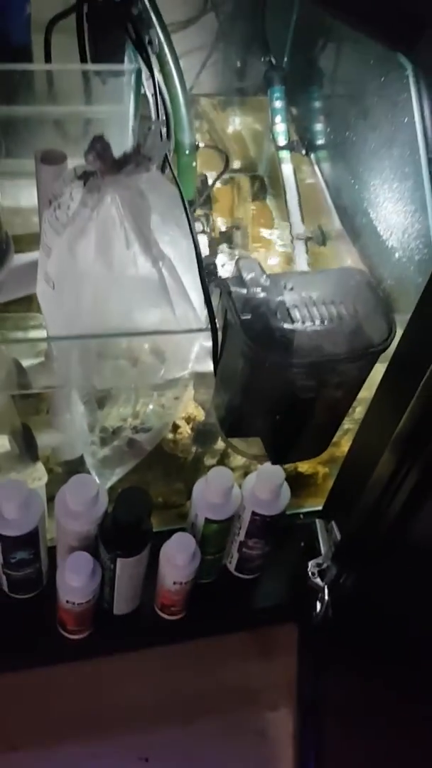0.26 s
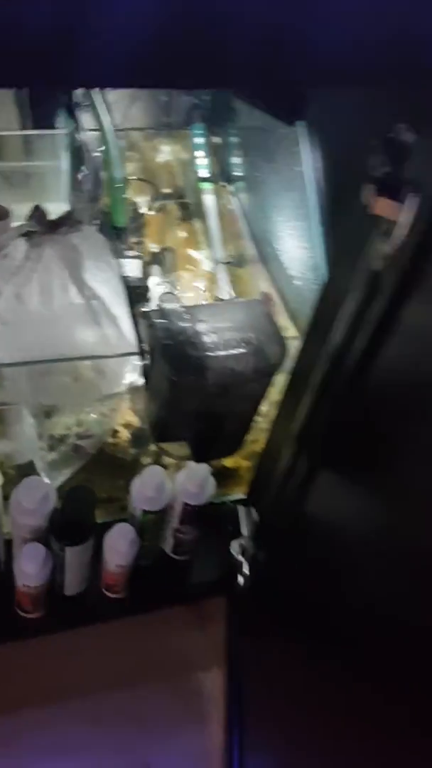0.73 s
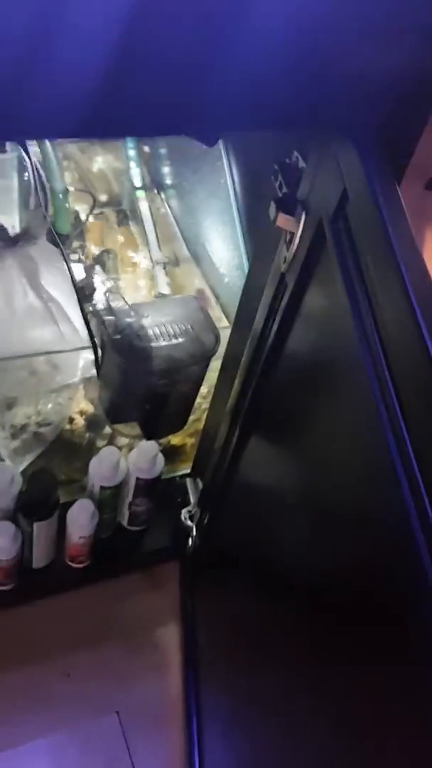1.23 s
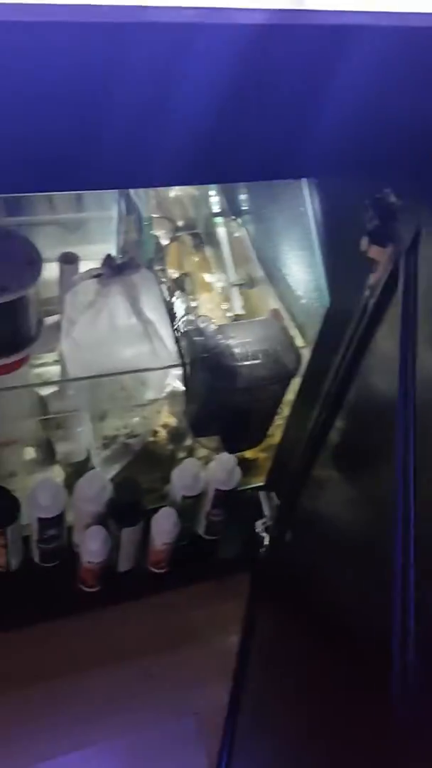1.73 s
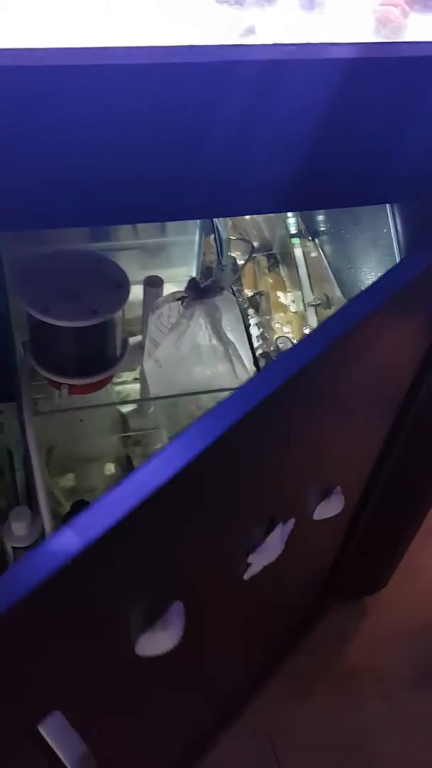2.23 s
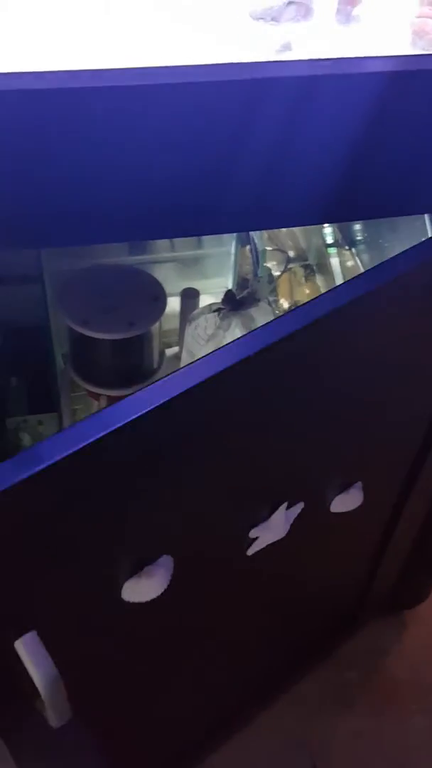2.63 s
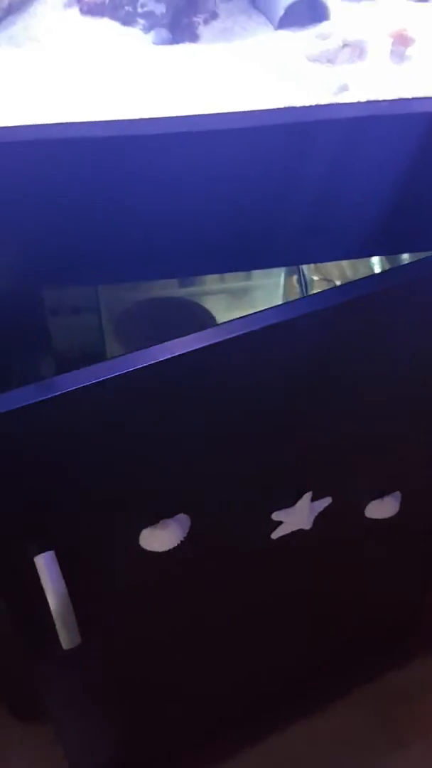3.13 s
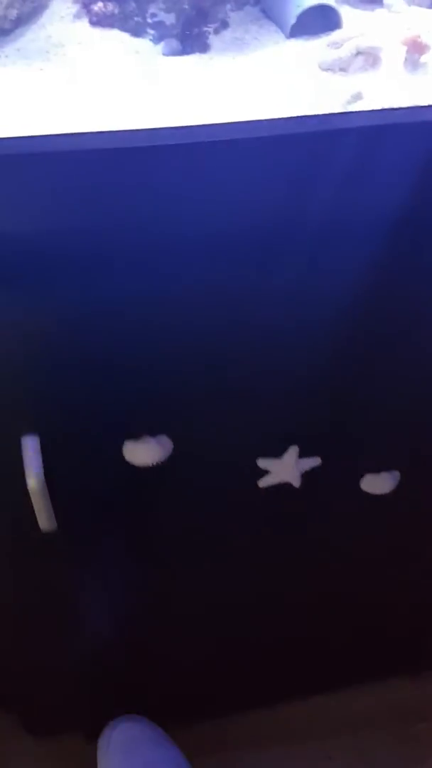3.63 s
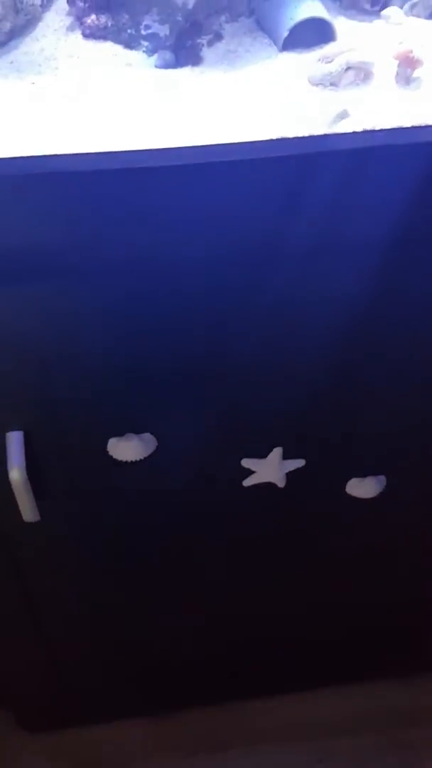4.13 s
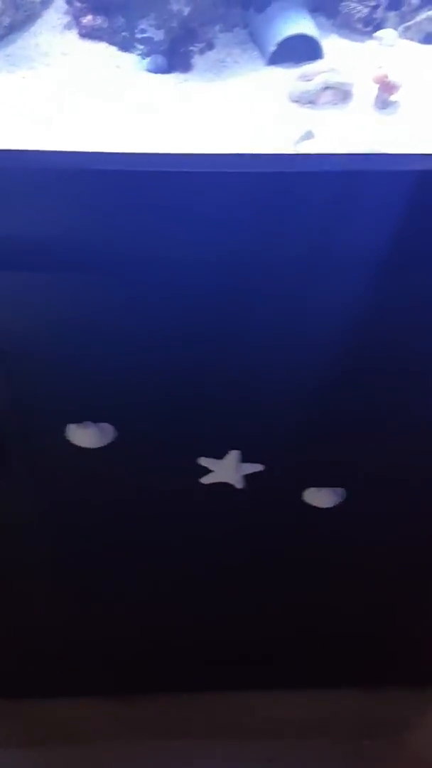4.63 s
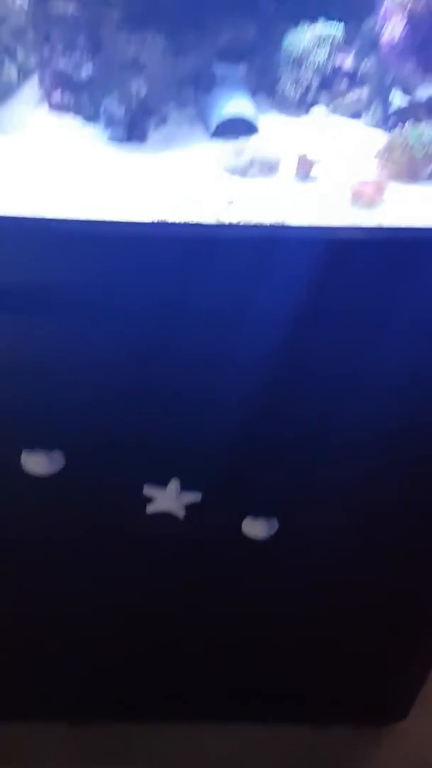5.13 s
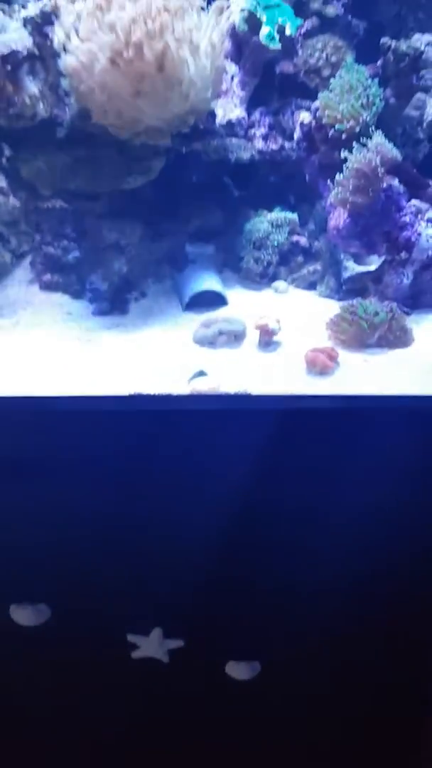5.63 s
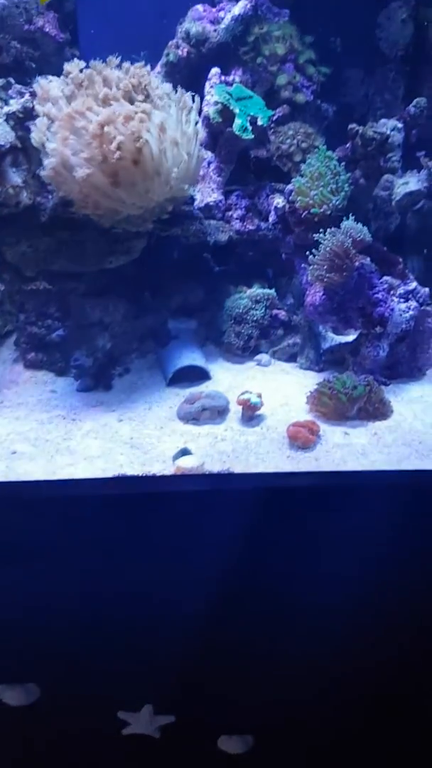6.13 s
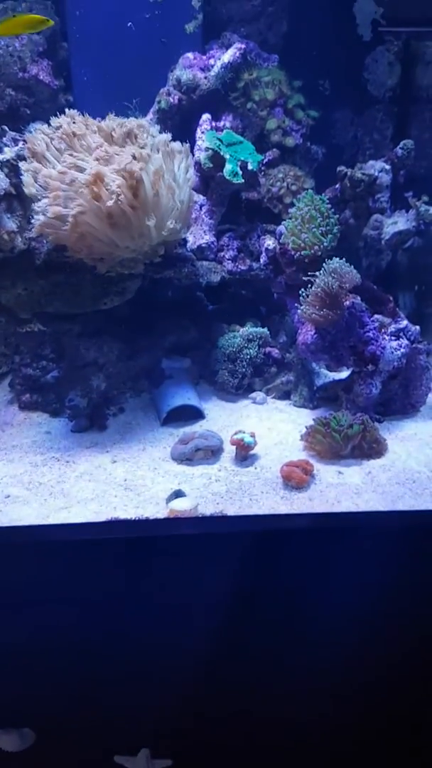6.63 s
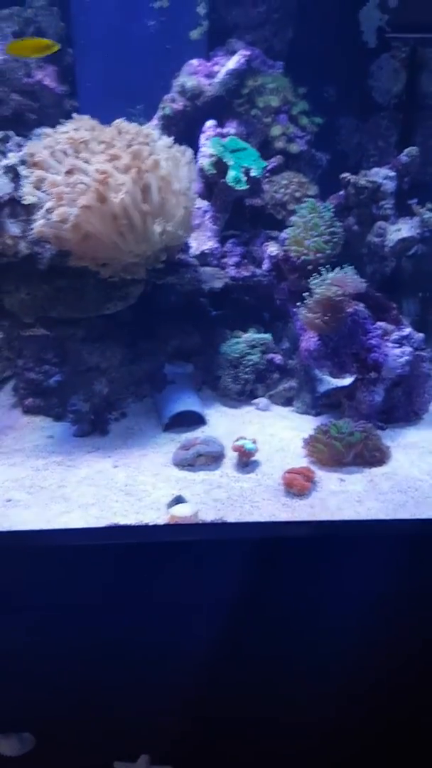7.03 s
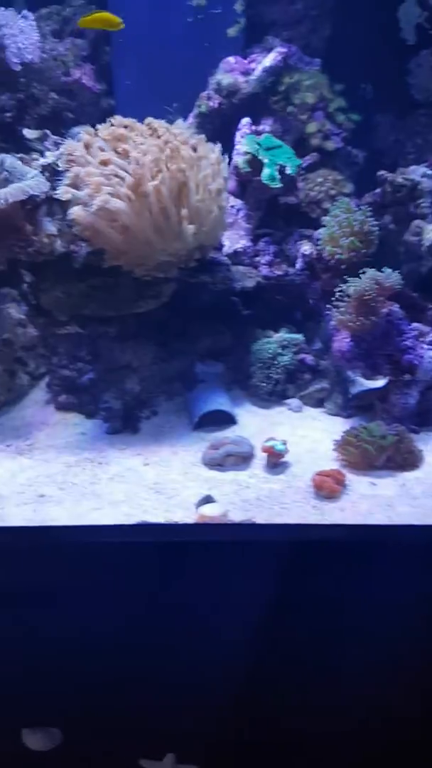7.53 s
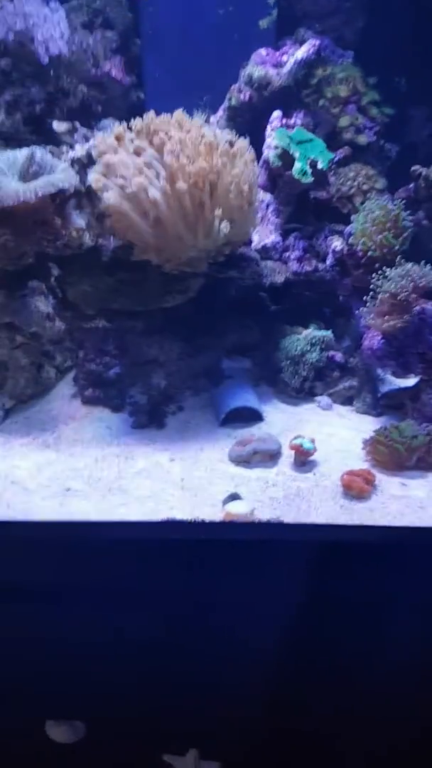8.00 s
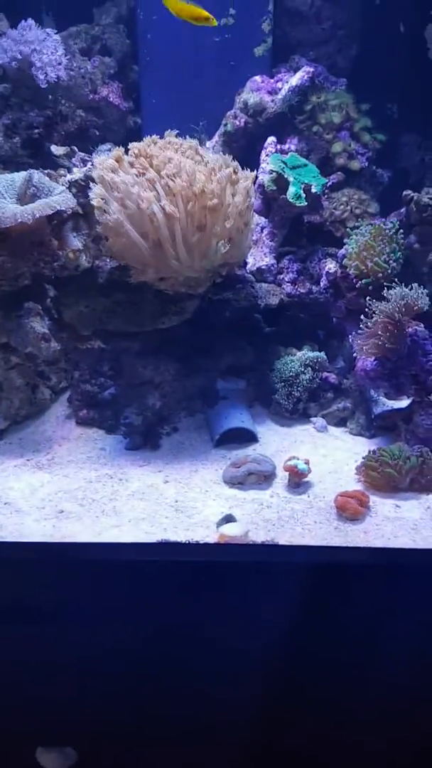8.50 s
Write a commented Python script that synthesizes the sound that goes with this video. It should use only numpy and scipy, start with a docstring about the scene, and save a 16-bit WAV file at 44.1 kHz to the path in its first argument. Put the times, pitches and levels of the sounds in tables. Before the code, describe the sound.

From the start, water trickles softly in an aquarium sump, a bright wash of tiny splashes with drips, fizz and occasional low gulps. A low pump hum lies underneath, fading after about 1 second and returning by 5 seconds. A wooden cabinet door gives a soft, dull bump at about 1.5 seconds and another at 2.6, with fainter knocks just after 3. At about 3.8 seconds the door slams shut close by, much the loudest sound, with a sharp metal latch snap, a low thrum and a brief rattle dying away by 4.2. Small ticks follow at about 4.4 and 4.7, and a faint knock at 6.4. The water dips briefly after the slam, then carries on quieter and more muffled, with distinct drops plinking and pipe gurgles over the hum until the end, near 8.8 seconds.

```python
"""A room with an aquarium, its sump trickling inside a wooden cabinet over the hum of mains pumps.
The water is a wash of tiny splashes, with bubbles that ring as drips, fizz, plinks and gulps.
The listener steps back; a hand bumps the door, which thrums, latches with a slam and rattles.
The slam ducks the gain control, and the drips plink on in the room while it recovers."""
import sys
import numpy as np
from scipy import signal
from scipy.fft import rfft, irfft
from scipy.io import wavfile
from scipy.ndimage import uniform_filter1d

SR = 44100
rng = np.random.default_rng(int(sys.argv[2]) if len(sys.argv) > 2 else 0)


def int16_out(signal):
    """Quantize to a 16-bit WAV file."""
    q = np.round(np.clip(np.atleast_2d(signal).T, -1, 1) * 32767)
    wavfile.write(sys.argv[1], SR, q.astype(np.int16))


N = 386316

# The water. Each row: time in seconds, level in dB, share of the bright colour 0-1, leftward lean in dB.
WATER_PATH = [(0.0, -46.5, .8, -1.5), (.85, -48.5, .85, -2), (1.25, -50, 0.78, -0.5),
              (1.45, -49.5, 0.45, -3.5), (1.75, -51.5, 0.63, -1.5), (2.2, -51, .46, -0.5),
              (3.4, -52, 0.56, -0.3), (3.7, -52.5, 0.63, 0), (4.95, -56, .3, 0.2), (5.4, -53.5, 0.39, 0.5),
              (5.75, -53.5, 0.3, 0), (6.5, -54.5, 0.42, 0), (6.8, -54.5, 0.44, 0.8),
              (7.5, -54.5, 0.24, 0.5), (8.25, -54.5, 0.35, 0.4), (8.76, -54, 0.53, 0.5)]
# Stereo width. Each row: frequency in Hz, correlation of left and right.
LIKENESS = [(60, 0.81), (180, 0.93), (550, 0.55), (1650, -0.15), (4970, -0.037), (15000, -0.019)]


def trickle():
    """Countless tiny splashes: patchy noise with flickering treble, drifting from bright to muffled."""
    # The bright and the muffled colour of the wash. Each row: frequency in Hz, level in dB.
    bright_tone = [(15, -52), (25, -27), (50, -4), (91, -12), (150, -9.5), (291, -3), (450, -12),
                   (730, -19.5), (1000, -17.5), (1500, -17.5), (2580, -14), (5500, -20.5), (15700, -29.5)]
    muffled_tone = [(15, -64), (25, -35), (43, -13), (70, -4.5), (91, -19), (169, -10), (291, 1.5),
                    (586, -22), (670, -17.5), (2080, -21.5), (2580, -17.5), (5490, -32), (15700, -36.5)]
    # Pipe and cabinet air resonances of each colour. Each row: centre in Hz, width in Hz, level in dB.
    bright_air = [(312, 100, -10.5), (551, 41, 8), (1010, 47, 4), (1224, 39, -8), (2020, 56, -10),
                  (2520, 140, -10.5)]
    muffled_air = [(133, 28, 4.5), (290, 14, -28), (557, 17, -22.5), (696, 73, -1), (1815, 170, -15),
                   (2555, 38, -5.5), (3170, 81, -32)]
    # Midrange swell around 915 Hz. Each row: time in seconds, boost in dB.
    mid_swell = [(0, 0.5), (1.2, 4.5), (2.7, 2.5), (3, -1), (4.5, 1.3), (4.9, 8.5), (5.3, -3), (7.2, -.1),
                 (7.4, 5), (7.8, 7), (8, .1), (8.76, -2.5)]
    # Stereo balance. Each row: frequency in Hz, leftward lean in dB.
    balance = [(60, 1), (180, -1.5), (550, -1), (1650, -2), (4970, -2.5), (15000, 4.5)]
    hop, size = 512, 2048
    frames, hz = N // hop + 5, np.fft.rfftfreq(size, 1 / SR)
    t = np.arange(frames) * hop / SR
    times, db, brightness, lean_db = np.transpose(WATER_PATH)
    brightness = np.interp(t, times, brightness)
    tone_db = brightness * cabinet_colour(bright_tone, bright_air, hz, t, gurgle_db=2.8)
    tone_db += (1 - brightness) * cabinet_colour(muffled_tone, muffled_air, hz, t, gurgle_db=0.68)
    mid_band = np.exp(-(np.log2(hz / 915 + 1e-9) / 0.26) ** 2)
    tone_db += np.outer(mid_band, np.interp(t, *np.transpose(mid_swell)))
    a, b, c, d, patches = rng.standard_normal((frames, len(hz), 5)).T
    patches = unit_rms(uniform_filter1d(uniform_filter1d(patches, size=20, axis=0), size=7, axis=1))
    spectra = stereo_pair(a + 1j * b, c + 1j * d, curve_at(LIKENESS, hz)[:, None])
    lean = curve_at(balance, hz)[:, None] + np.interp(t, times, lean_db)
    spectra *= amp(tone_db + np.interp(t, times, db) + 1.33 * patches + np.array([lean, -lean]) / 2)
    treble = np.clip(np.log2(hz / 2500 + 1e-9) / 1.97, 0, 1)[:, None]
    layers = [spectra * (1 - treble), spectra * treble]
    body, spray = amp(6) * signal.istft(layers, nperseg=size, noverlap=size - hop)[1][..., :N]
    coarse = np.arange(0, N, 100) / SR
    flicker_db = np.interp(np.arange(N) / SR, coarse, 2 * drift(coarse, 6, 60))
    return body + spray * amp(flicker_db)


def cabinet_colour(tone, resonances, hz, t, gurgle_db):
    """A broad spectrum in dB with air resonances standing out of it, each gurgling on its own."""
    power = amp(curve_at(tone, hz))[:, None] ** 2
    for centre, width, db in resonances:
        peak = 1 / (1 + (2 * (hz - centre) / width) ** 2) ** 2
        power = power + np.outer(peak, amp(db - 5.5 + gurgle_db * drift(t, 7.1, 22)) ** 2)
    return 10 * np.log10(power / power[(hz > 450) & (hz < 9000)].sum(0).mean())


def bubble(hz, cycles, glide):
    """A bubble rings down, to 1/e after `cycles` periods, while its pitch rises."""
    t = np.arange(0, 4 * cycles / hz, 1 / SR)
    tone = np.sin(2 * np.pi * hz * t * (1 + glide * t * hz / cycles))
    return tone * np.exp(-t * hz / cycles) * (1 - np.exp(-t / 0.00032))


def drips():
    """Each splash frees four bubbles of nearby pitch, one after another."""
    # The loudest splashes. Each row: start in seconds, level in dB, pitch in Hz, leftward lean in dB.
    splashes = [(.2753, -40, 3600, -7), (.408, -48, 2060, -4), (.4618, -38.5, 3840, -11),
                (.4903, -43, 2220, -5.5), (.7213, -38.5, 3330, -1.5), (1.1922, -42, 4060, -9),
                (1.3997, -44, 1710, -2), (1.494, -47, 1590, -1), (1.5843, -44.5, 2980, -3),
                (1.6901, -43.5, 4030, -2.5), (2.2288, -45, 1730, -6), (2.7137, -46, 2100, 2),
                (2.9816, -44.5, 3460, -7), (3.4615, -43, 2080, -1.5), (3.5214, -45, 2020, -2),
                (4.3295, -41.5, 2920, 5), (5.0128, -47.5, 1620, -3), (5.3117, -42, 2820, 2),
                (5.125, -46, 4600, -1), (5.389, -46, 2780, 4), (5.44, -44, 4150, -1),
                (5.6334, -44, 3500, .5), (5.7008, -40.5, 3140, 8), (5.74, -42, 2970, .5),
                (5.8275, -44, 3320, -3), (6.1443, -44.5, 3400, .5), (6.4885, -44, 3670, 1),
                (6.5518, -42, 3150, 14), (6.7778, -41.5, 2960, .5), (7.13, -47.5, 1765, .5),
                (7.1779, -42, 4050, -1), (7.2877, -45, 3150, 8), (7.345, -44, 3150, .1),
                (7.4259, -46, 3630, -2.5), (7.592, -45, 4940, -3), (7.7746, -41.5, 3280, 6),
                (7.8404, -46, 1760, -1.5), (8.3677, -43, 3660, 5), (8.6092, -39, 3500, .1),
                (8.6895, -48, 3430, -1.5)]
    rows = splashes + strays(1700, 4200, over_db=3.5, spread_db=2.7, count=50)
    out, chance = np.zeros((2, N)), rng.uniform(-1, 1, (len(rows), 4, 3))
    for (start, db, hz, lean_db), draws in zip(rows, chance):
        for k, (late, detune, size) in enumerate(draws):
            ring = bubble(hz * (1 + k * 0.079 * detune), cycles=8.2, glide=0.0076)
            place(out, start + k * 0.012 * (1 + late), amp(db - 2.3 * k + 2.2 * size) * ring, lean_db)
    return out


def drain_pipe():
    """Single drops plink once in the pipe; large bubbles gulp far lower."""
    # The loudest plinks and gulps. Each row: start in seconds, level in dB, pitch in Hz.
    plinks = [(.3935, -46, 2600), (.6035, -51, 2650), (.8545, -42, 2620), (2.6948, -45.5, 2400),
              (3.4627, -41.5, 2380), (5.598, -48, 2600), (5.7484, -46, 2570), (6.641, -46, 2520),
              (6.7863, -43.5, 2560), (6.8165, -48, 2580), (6.849, -42, 2570), (6.905, -44.5, 2530),
              (7.152, -45.5, 2300), (7.216, -44, 2570), (7.2865, -45.5, 2620), (7.3196, -46, 2640),
              (7.8115, -44.5, 2540), (8.0364, -46, 2540), (8.2466, -43, 2540), (8.3687, -45, 2550),
              (8.6448, -43.5, 2560)]
    gulps = [(.27, -39, 295), (.476, -36.5, 368), (.706, -37, 990), (0.849, -38, 1010), (1.033, -37, 1010),
             (1.105, -36.5, 314), (1.96, -39, 284), (2.325, -39.5, 356), (2.453, -38.5, 287),
             (2.625, -34.5, 314), (2.76, -38.5, 201), (3.252, -34.5, 315), (4.925, -36, 290),
             (5.47, -37, 263), (5.665, -35, 297), (5.74, -39, 700), (6.144, -38, 278), (6.597, -36, 301),
             (7.173, -36, 290), (7.267, -39, 310), (8.418, -35, 269), (8.547, -37.5, 290),
             (8.627, -35, 282)]
    out = np.zeros((2, N))
    for start, db, hz, *_ in plinks + strays(2480, 2630, over_db=3.8, spread_db=1.6, count=40):
        place(out, start, amp(db) * bubble(hz, cycles=29, glide=0.0014), lean_db=-3.3)
    for start, db, hz, *_ in gulps + strays(229, 364, over_db=7.9, spread_db=2.5, count=32):
        place(out, start, amp(db) * bubble(hz, cycles=3.8, glide=0.012), lean_db=-1.8)
    return out


def strays(low_hz, top_hz, over_db, spread_db, count):
    """Fainter random drops that follow the water, as rows of start, level, pitch and lean."""
    when, size, pitch, side = rng.random((count, 4)).T
    times, db, _, lean_db = np.transpose(WATER_PATH)
    starts = when * N / SR
    levels = np.interp(starts, times, db) + over_db + spread_db * (2 * size - 1)
    leans = np.interp(starts, times, lean_db) + 2.5 * (2 * side - 1)
    return list(zip(starts, levels, low_hz * (top_hz / low_hz) ** pitch, leans))


def fizz():
    """Small bubbles and spray click at random, as loud as the water goes."""
    out, (times, db) = np.zeros((2, N)), np.transpose(WATER_PATH)[:2]
    count = int(8 * N / SR)  # eight a second at each pitch
    for k, hz in enumerate(np.geomspace(2200, 12000, num=20)):
        when, size = rng.random((200, 2))[:count].T
        pops = np.zeros(N)
        pops[(when * N).astype(int)] = amp(6.9 * np.minimum(-np.log(size), 3))
        grain = bubble(hz, cycles=7000 / hz + 2.1, glide=0.0524) * amp(-3.5 * np.log2(hz / 2000))
        out[k % 2] += signal.oaconvolve(pops, grain)[:N]
    return amp(np.interp(np.arange(N) / SR, times, db) - 5) * (out + 0.27 * out[::-1])


def door_knocks():
    """Each blow is a rounded push on the low modes plus a crunch; longer contact dulls both."""
    # The door's low modes. Each row: frequency in Hz, level in dB, t60 in seconds.
    modes = [(76.6, -12, 0.98), (112.6, -12, 1), (142.2, -6, 0.62), (196, -19, .25), (213.5, 6.5, 0.22),
             (246.9, 3.5, 0.38), (317, -16, 0.12), (349.4, 0.5, 0.3), (379.3, 2.5, 0.26), (437, -2.5, 0.32),
             (489, -4.5, 0.36), (502, 2, 0.2), (550, -2, 0.28), (720, -10, 0.25), (875, -11, 0.14)]
    # Blows on the door. Each row: start in seconds, ring level in dB, contact time in ms,
    # crunch level in dB, crunch t60 in seconds.
    blows = [(1.478, -32, 3.5, -42, 0.067), (1.497, -24, 2.4, -45, 0.074), (2.64, -27, 1.53, -60, 0.085),
             (3.034, -39, 1.7, -43.5, .1), (3.235, -35, 3.9, -46, 0.11), (3.758, -29, 0.24, -30, 0.21),
             (3.808, -14, 0.48, 3, 0.069), (3.811, -4, 1.7, -32, .1), (3.821, -13, 0.27, -3.5, 0.18),
             (3.833, 10, 0.75, -3.5, 0.28), (3.857, -4, 0.5, -9, 0.41), (3.97, -19, 0.66, -18, 0.058),
             (4.014, -11.5, 1.48, -16, 0.099), (4.066, -24, 0.84, -24, 0.048),
             (4.154, -30, 0.74, -34, 0.048), (4.386, -32.5, 0.45, -36, 0.019), (4.72, -46, 0.66, -35, .1),
             (6.3735, -37.5, 1.3, -42, 0.047)]
    # The crunch, dense modes of door and frame. Each row: frequency in Hz, level in dB.
    crunch_tone = [(90, 2), (150, 4.5), (240, 8), (450, -1), (700, -2), (1000, -3), (1400, -3.5),
                   (2200, -3), (3200, -13), (5500, -22), (9000, -24.5), (15000, -40)]
    out, t = np.zeros((2, N)), np.arange(SR // 2) / SR
    ring = sum(amp(db - 60 * t / t60) * np.sin(2 * np.pi * hz * t) for hz, db, t60 in modes)
    hz = np.fft.rfftfreq(len(t), 1 / SR)
    attack = 1 - np.exp(-t / 0.00017)
    for start, db, contact_ms, crunch_db, t60 in blows:
        thud = np.convolve(ring, np.hanning(int(contact_ms * SR / 500) + 3))
        thud *= amp(-45 * contact_ms * np.arange(len(thud)) / SR)  # a resting hand damps the ring
        place(out, start, amp(db) * thud / abs(thud).max(), lean_db=-2.5)
        spectra = stereo_pair(*rfft(rng.standard_normal((2, len(t)))), curve_at(LIKENESS, hz))
        dulling = np.sqrt(1 + (hz * contact_ms / 4300) ** 4)
        noise = irfft(spectra * amp(curve_at(crunch_tone, hz)) / dulling, len(t))
        low = uniform_filter1d(noise, size=9)
        crunch = low * amp(-60 * t / t60) + (noise - low) * amp(-60 * t / (0.78 * t60))
        place(out, start, amp(crunch_db) * attack * crunch / noise.std(), lean_db=-2.4)
    return out


def latch():
    """Latch and hinge tick: a short, rough metal ring with a bright snap."""
    # Each row: start in seconds, level in dB, pitch in Hz, relative snap in dB, leftward lean in dB.
    ticks = [(3.759, -20.5, 2220, -2, -8), (3.8095, -17.5, 3430, -10, -15), (3.8209, -2.5, 1990, 7.5, 9),
             (4.028, -32, 2520, -1, -2), (4.3863, -39, 3160, -21, 6), (4.509, -55, 2520, 17, -6),
             (4.7205, -27, 2480, -4, -1), (4.7235, -23, 2880, -11, -10), (6.372, -48, 5950, 3, 0)]
    out, t = np.zeros((2, N)), np.arange(1500) / SR
    snap_band = signal.butter(1, [3500, 11000], "bandpass", fs=SR)
    for start, db, hz, snap_db, lean_db in ticks:
        grit, hiss = rng.standard_normal((2, len(t)))
        rough = 1 + 1.6 * unit_rms(uniform_filter1d(uniform_filter1d(grit, size=16), size=16))
        ring = rough * np.sin(2 * np.pi * hz * t) * np.exp(-t / 0.0012) * (1 - np.exp(-t / 0.000079))
        snap = signal.lfilter(*snap_band, 1.4 * (t == 0) + 0.56 * hiss * np.exp(-t / 0.00054))
        place(out, start, amp(db) * (ring + amp(snap_db) * snap), lean_db)
    return out


def door_thrum():
    """The moving door thrums at its lowest mode in rounded swells, its pitch slightly unsteady."""
    # Each row: start in seconds, length in seconds, level in dB.
    swells = [(1.468, 0.13, -34.5), (1.62, 0.14, -45), (1.75, .15, -44.5), (2.39, 0.15, -51),
              (2.627, 0.17, -30), (2.806, 0.12, -40.5), (2.978, 0.32, -47.5), (3.21, 0.19, -43),
              (3.56, 0.2, -45.5), (3.807, 0.19, -11), (3.984, 0.13, -17), (4.106, 0.15, -31)]
    mode_hz, skew, sharpness = 79, 0.66, 1.07  # skew under 1 puts the peak early
    t, level = np.arange(N) / SR, np.zeros(N)
    hz = mode_hz + 2.53 * np.interp(t, t[::400], drift(t[::400], 0.17, 4.64))
    for start, length, db in swells:
        progress = np.clip((t - start) / length, 0, 1)
        level += amp(db) * abs(np.sin(np.pi * progress ** skew)) ** sharpness
    return amp([[-1.6], [1.6]]) * level * np.sin(2 * np.pi * np.cumsum(hz) / SR)


def pumps(mains_hz=49.45):
    """The pumps hum at multiples of the mains, each wavering on its own."""
    # Each row: multiple of the mains, level in dB.
    harmonics = [(1, -11), (2, -1.3), (6, -9), (11, -15)]
    # The hum changes as the listener moves. Each row: time in seconds, level in dB.
    hum_path = [(0.0, -48.5), (.8, -51.5), (.97, -61), (1.3, -63), (4.95, -50.5), (5.8, -49), (6.3, -52),
                (7.1, -49.5), (8.76, -51.5)]
    t, hum = np.arange(N) / SR, np.zeros(N)
    coarse = t[::400]
    for order, db in harmonics:
        waver = np.interp(t, coarse, amp(3 * drift(coarse, 1, 12)))
        phase = np.interp(t, coarse, 0.71 * drift(coarse, 0.2, 2.3))
        hum += amp(db) * waver * np.sin(2 * np.pi * order * mains_hz * t + phase)
    return amp(np.interp(t, *np.transpose(hum_path)) + np.array([[-1.5], [1.5]])) * hum


def room(send):
    """The room answers with sparse reflections of random sign, each band dying at its own speed."""
    # Each row: frequency in Hz, t60 in seconds.
    decay = [(120, 0.69), (320, 0.38), (840, 0.22), (2210, 0.28), (5820, 0.32)]
    taps = np.zeros((2, SR))
    delays = np.arange(200, SR - 20, 20) + rng.integers(0, 20, (2, (SR - 201) // 20))
    np.put_along_axis(taps, delays, rng.choice([-1., 1.], delays.shape), 1)
    hz, t, spectra = signal.stft(taps, SR, nperseg=256)
    spectra = stereo_pair(*spectra, curve_at(LIKENESS, hz)[:, None])  # bass reaches both sides alike
    tail = signal.istft(spectra * amp(-60 * t / curve_at(decay, hz)[:, None]), SR, nperseg=256)[1]
    return signal.fftconvolve(send.mean(0)[None], tail / np.linalg.norm(tail[0]), axes=1)[:, :N]


def amp(db):
    """Decibels to gain."""
    return 10 ** (np.asarray(db) / 20)


def unit_rms(x):
    """Scales to rms 1."""
    return x / np.sqrt(np.mean(x ** 2) + 1e-20)


def curve_at(points, hz):
    """Reads a table over a log-frequency axis."""
    freqs, values = np.transpose(points)
    return np.interp(np.log(hz + 1), np.log(freqs + 1), values)


def drift(t, low_hz, top_hz):
    """A random wander: sines of random phase, the slow ones largest."""
    rates = np.geomspace(low_hz, top_hz, num=24)
    return unit_rms(sum(np.sin(2 * np.pi * (hz * t + rng.random())) / np.sqrt(hz) for hz in rates))


def stereo_pair(left, other, likeness):
    """Blends two independent noises into a correlated left and right."""
    return np.array([left, likeness * left + np.sqrt(1 - likeness ** 2) * other])


def place(mix, start, sound, lean_db):
    """Adds a sound at `start` seconds; positive lean is to the left."""
    part = mix[:, round(start * SR):][:, :sound.shape[-1]]
    part += amp([[lean_db / 2], [-lean_db / 2]]) * sound[..., :part.shape[1]]


def scene():
    """All sources, with the room answering the knocks, ticks and drops."""
    knocks, ticks, drops, pipe = door_knocks(), latch(), drips() + fizz(), drain_pipe()
    echoes = room(amp(-6) * knocks + amp(-2.5) * ticks + amp(3) * drops + amp(-4) * pipe)
    return trickle() + pumps() + door_thrum() + knocks + ticks + drops + pipe + echoes


def record(dry):
    """The microphone drops deep bass; gain control ducks and creeps back; peaks clip; the top is cut."""
    threshold_db, recovery_db_per_s, top_hz = -21, 12, 15800
    dry = signal.sosfilt(signal.butter(3, 44, "highpass", fs=SR, output="sos"), dry)
    power_db = 10 * np.log10(abs(uniform_filter1d((dry ** 2).mean(0), size=800)) + 1e-12)
    cut_db = 0.5 * np.maximum(power_db - threshold_db, 0)
    recovery = np.arange(N) * recovery_db_per_s / SR
    cut_db = np.maximum.accumulate(cut_db + recovery) - recovery
    ducked = dry / amp(uniform_filter1d(cut_db, size=400))
    lowpass = signal.firwin(511, top_hz, window=("kaiser", 9), fs=SR)
    return signal.oaconvolve(np.clip(ducked, -1, 1), lowpass[None], "same")


dry = scene()
out = record(dry)
int16_out(out)
```